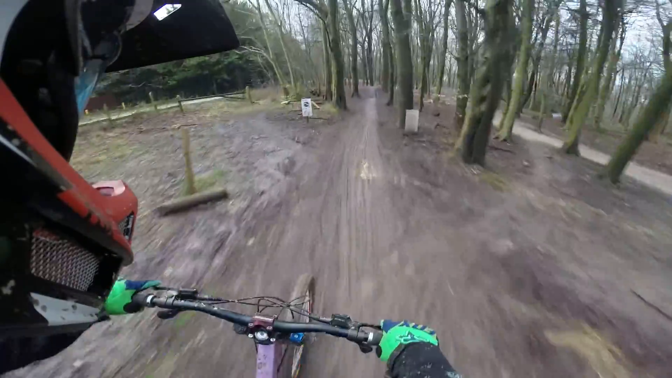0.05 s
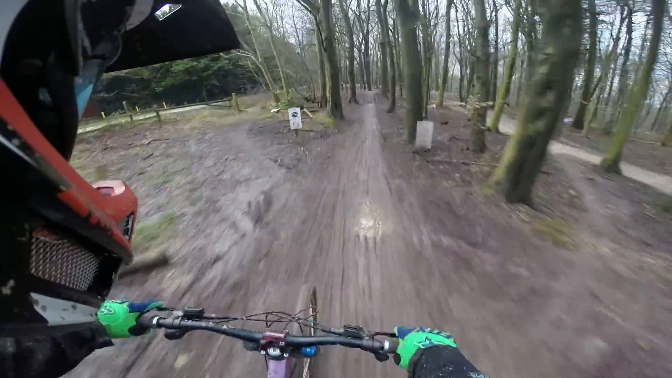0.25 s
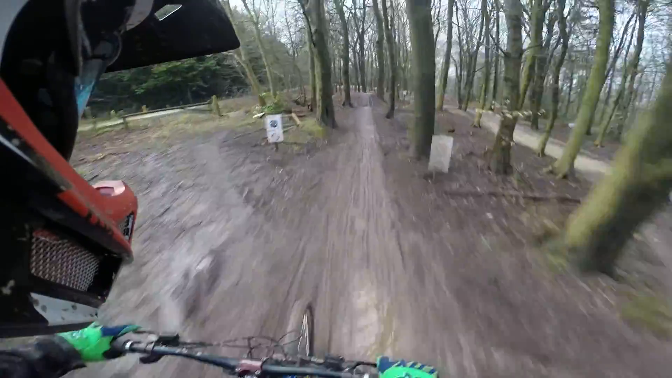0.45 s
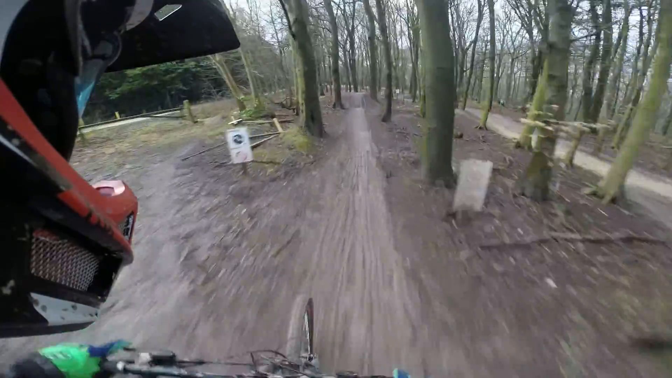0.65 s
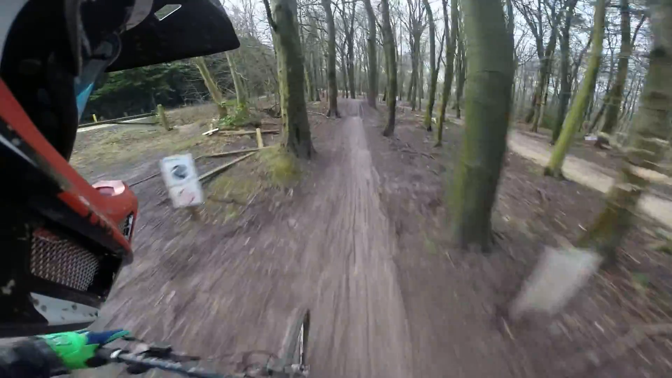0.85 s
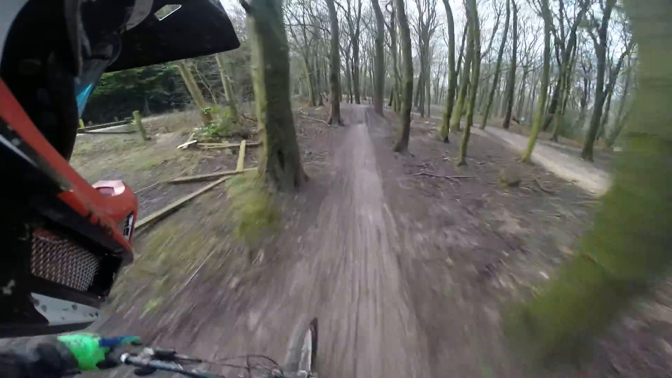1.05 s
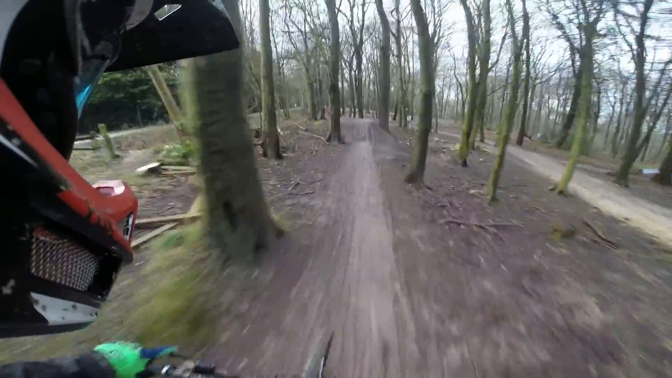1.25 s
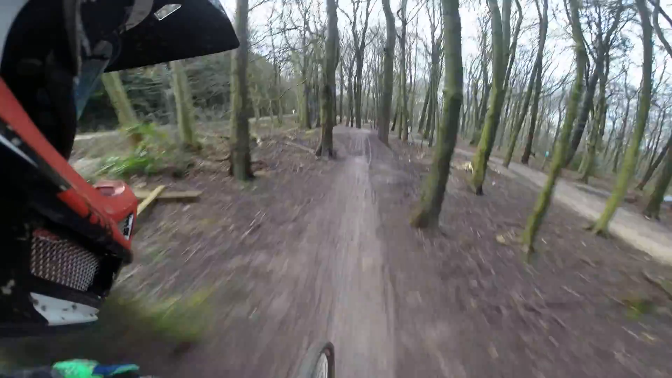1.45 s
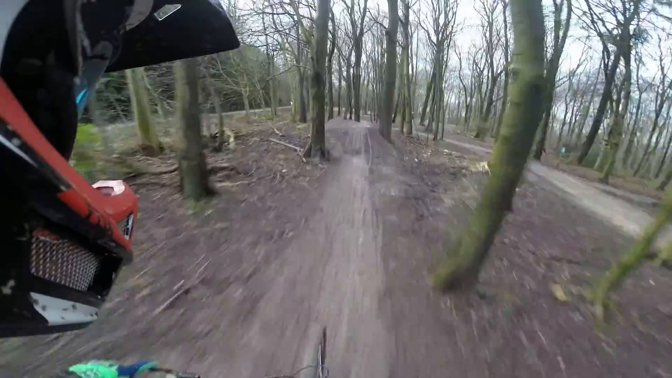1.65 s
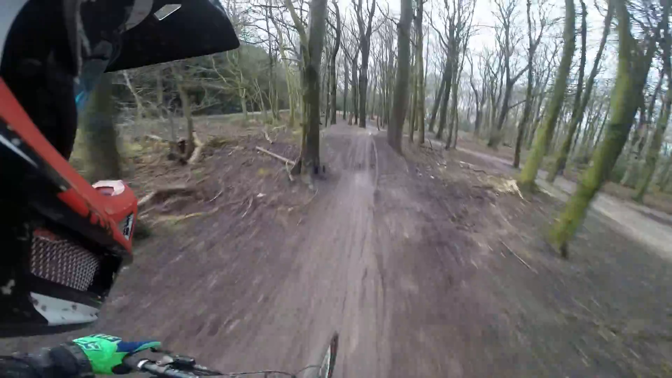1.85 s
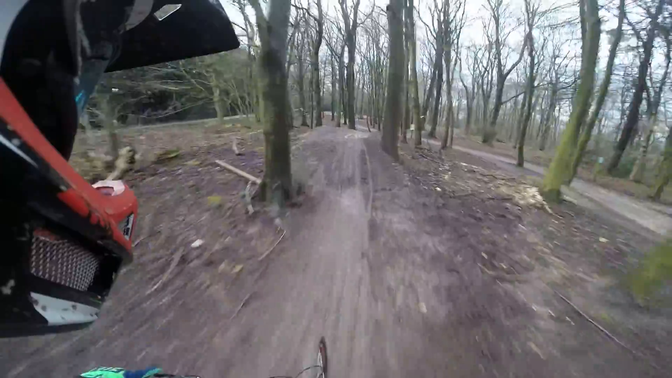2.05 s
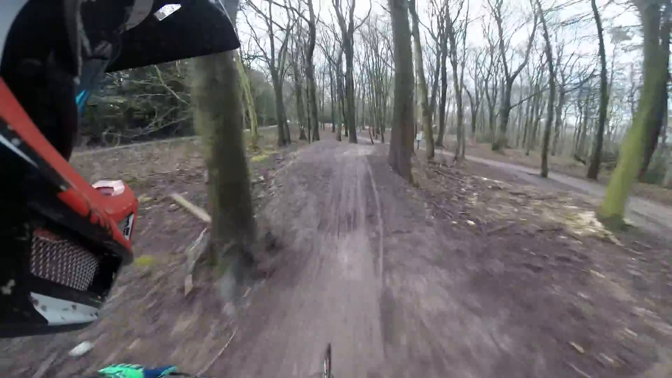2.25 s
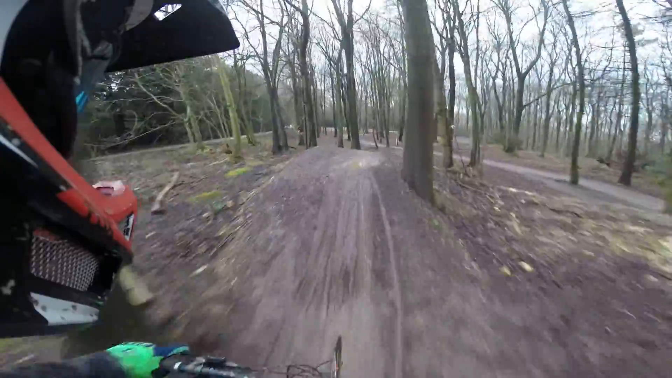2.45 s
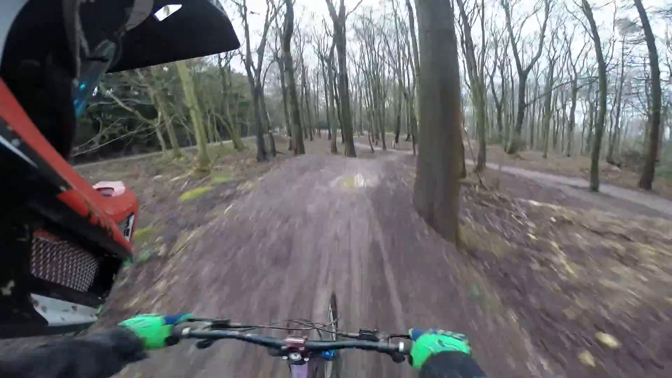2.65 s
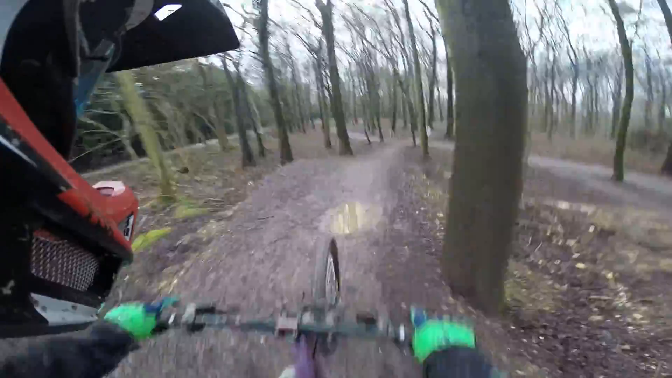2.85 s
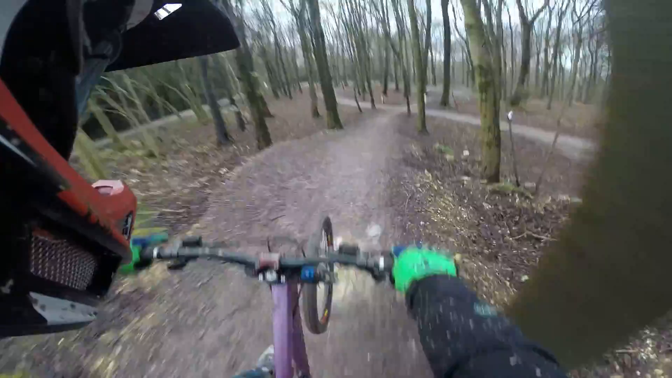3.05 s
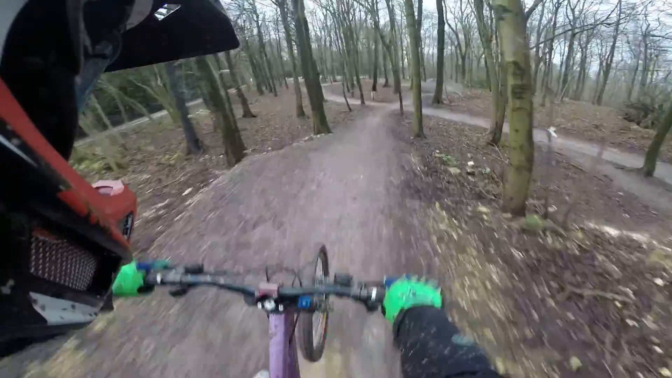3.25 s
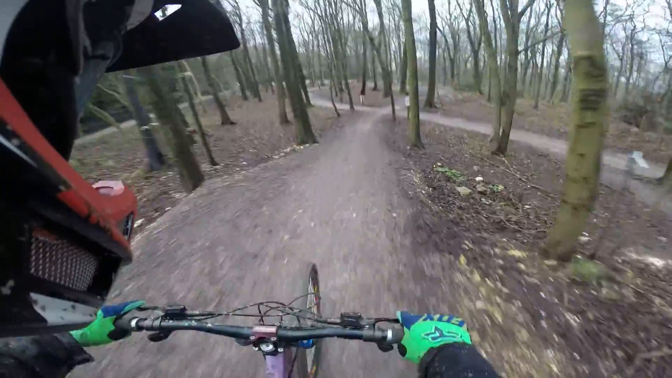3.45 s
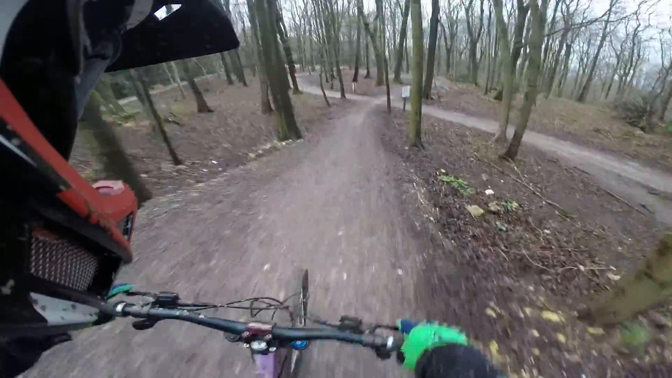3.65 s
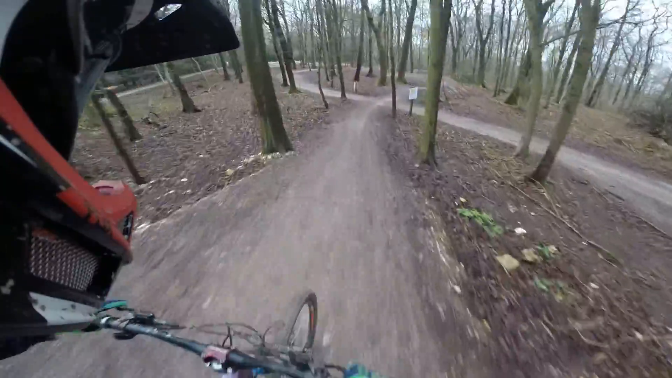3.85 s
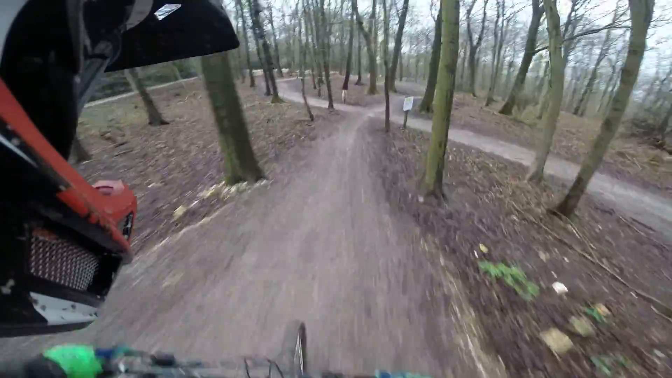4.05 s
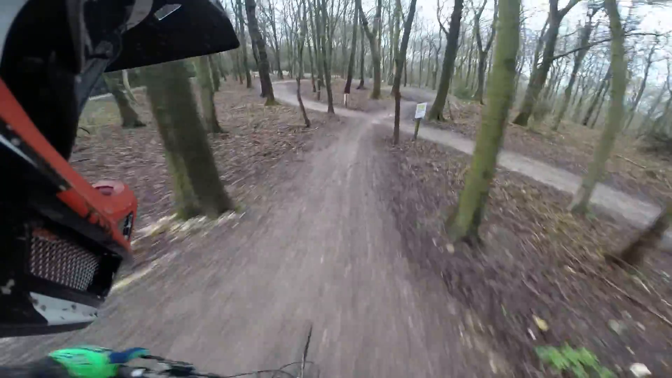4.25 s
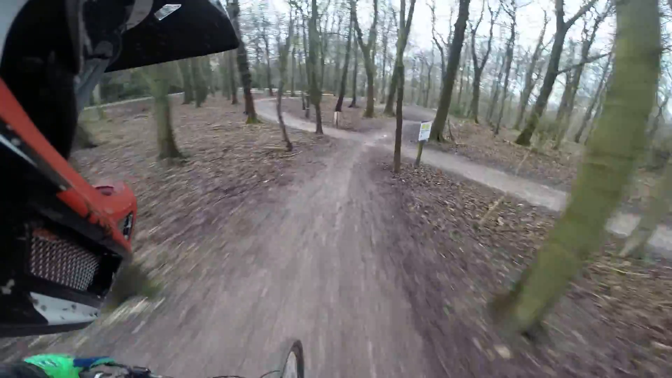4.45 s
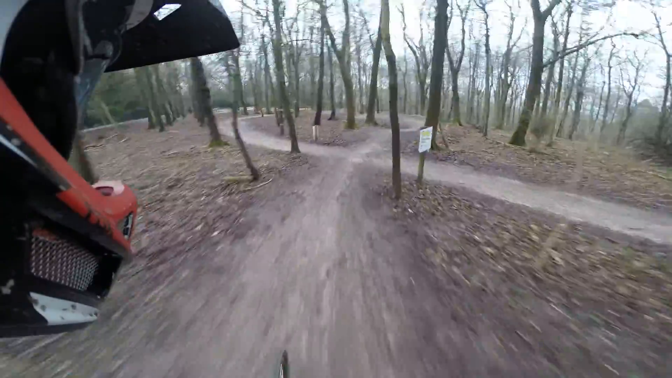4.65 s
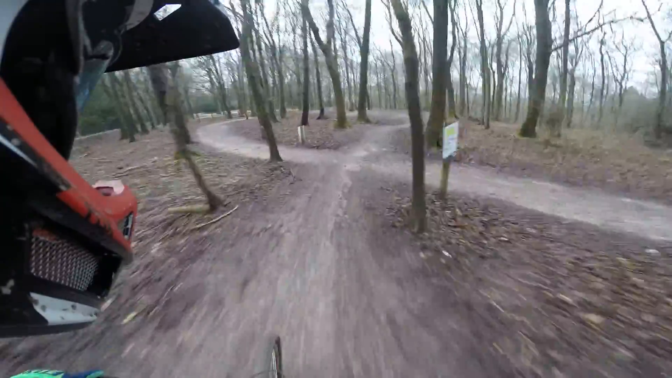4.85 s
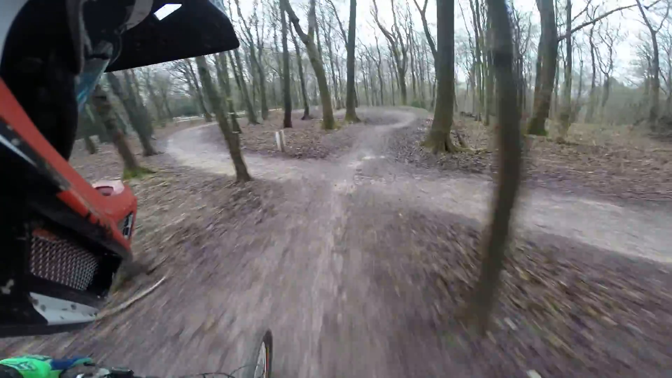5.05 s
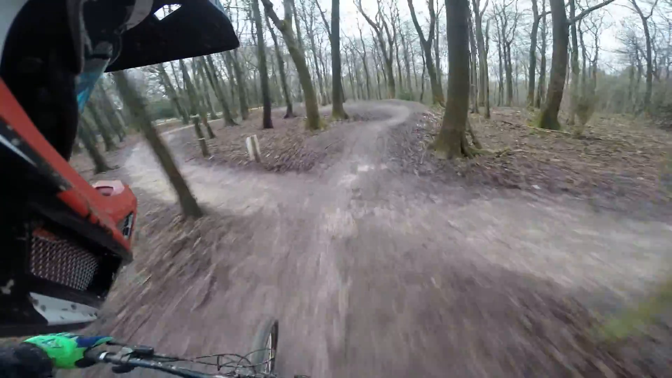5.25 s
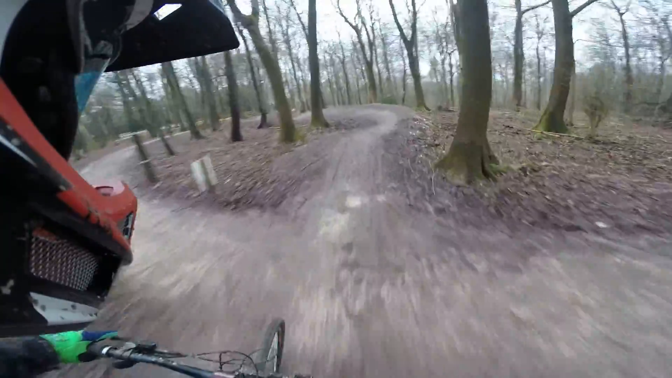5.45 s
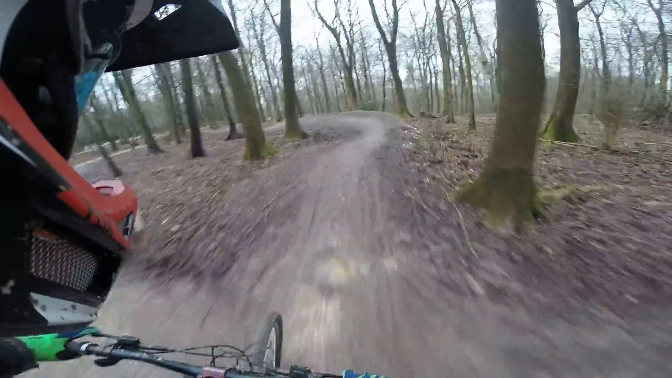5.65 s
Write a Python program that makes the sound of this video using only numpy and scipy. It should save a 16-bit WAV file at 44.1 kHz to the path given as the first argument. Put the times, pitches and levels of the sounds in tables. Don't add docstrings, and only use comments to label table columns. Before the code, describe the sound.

Close, muffled helmet microphone outdoors: steady coarse tyre crunch and fine watery spray, irregular stone clicks and deep wind buffeting. Around the middle come quick mud slaps, a loud thump with low ringing hum, a sudden drop in rolling as the bike lifts, and a rattly landing. Quieter rolling with faint leaf swishes follows, then stones clatter and the drier crunch swells to the end.

```python
import sys
import numpy as np
from scipy import signal
from scipy.fft import rfft, irfft
from scipy.io import wavfile

SR = 44100
rng = np.random.default_rng(int(sys.argv[2]) if len(sys.argv) > 2 else 0)


def transcribe(signal):
    frames = np.atleast_2d(signal).T
    limited = np.clip(frames, -1, 1)
    pcm = np.round(limited * 32767).astype(np.int16)
    wavfile.write(sys.argv[1], SR, pcm)


N = 251370

# time_s, rolling_db, wetness_db (sizzle re rolling), mount_hum_db
TRAIL = [(0.0, -45.5, -7.5, -53), (0.4, -46, -8.5, -53), (0.88, -45, -8, -56), (0.96, -45.5, -12.5, -52.5),
         (1.45, -42, -10.5, -51.5), (2.25, -42.5, -9.5, -55), (2.55, -44.5, -7, -52.5),
         (2.8, -48.5, -6, -52), (2.97, -47.5, -4.5, -55), (3.06, -50, -10, -42), (3.16, -46.5, -17.5, -52),
         (3.23, -56, -12, -56), (3.6, -53.5, -8, -65), (4.12, -51, -15, -55), (4.24, -45, -18, -61),
         (4.5, -42.5, -14, -56), (5.02, -40.5, -15, -58), (5.7, -43, -14.5, -57)]
# centre_s, extra_wetness_db, half_width_s
PUDDLES = [(.06, 4.5, 0.018), (.2, 4, 0.083), (.57, 4, 0.099), (.8, 2, 0.052), (1.04, 4, 0.029),
           (1.36, 4, 0.047), (1.53, 1, 0.034), (1.63, 1.5, 0.033), (1.85, 4, 0.024), (2.0, 1, 0.025),
           (2.16, 1, 0.027), (2.27, 5.5, 0.017), (2.38, 4.5, 0.021), (2.6, 1, .03), (2.74, 6, 0.02),
           (2.81, 3.5, 0.057), (2.89, 2.5, 0.016), (3.47, 10.5, 0.035)]
# pitch_hz, width_hz, level_db
CASE_LOW = [(1600, 158, -3), (1952, 690, -1.5), (2180, 390, 3.5), (2568, 303, 1)]
CASE_EDGE = [(2786, 175, 1.5), (3220, 460, -4.5)]
CASE_MID = [(3830, 330, -4.5), (4750, 710, 3.5), (4845, 246, 6), (6000, 476, 2.5)]
CASE_TOP = [(7160, 410, 5), (8800, 790, 2.5), (9910, 430, 3), (11000, 660, -0.5), (13000, 2500, -8)]
# start_s, dull_db, bright_db
STONES = [(0.128, -47, -36), (0.176, -31, -45), (0.519, -31, -40), (0.5545, -50, -36), (0.574, -35, -35),
          (1.131, -20, -36.5), (1.661, -33, -33), (2.0046, -20, -38), (2.1665, -35, -47),
          (2.3066, -16, -35), (2.6447, -22, -47), (2.6995, -21, -35), (2.7668, -28, -31.5),
          (2.825, -46, -42), (3.1592, -41, -53), (3.2122, -54, -58), (3.366, -36, -53), (3.4216, -23, -46),
          (3.754, -40, -50), (3.9764, -85, -50), (4.19, -37, -47), (4.2675, -33, -43), (4.2825, -27, -45),
          (4.433, -26, -47), (4.4674, -38, -45), (4.5118, -22.5, -41), (4.6828, -24, -43),
          (4.6957, -25, -41), (5.223, -53, -38), (5.384, -53, -53)]
# start_s, level_db,
# pitch_hz, t60_s
PINGS = [(1.6611, -27, 2110, 0.048), (1.663, -32, 6100, .012), (2.3076, -9.5, 2370, 0.0058),
         (2.3067, -21.5, 6000, 0.0045), (2.307, -40, 12650, 0.0066), (2.645, -28.5, 2420, 0.034),
         (2.7665, -36, 6070, 0.0068), (2.8456, -27, 3080, 0.013), (3.2120, -45.5, 450, 0.13),
         (3.212, -38, 6100, 0.0067), (3.4304, -26.5, 2800, 0.013), (3.4430, -39.5, 8150, 0.0064),
         (3.4440, -30.5, 450, 0.036), (3.4460, -38, 623, .06), (3.461, -30.5, 1600, 0.01),
         (3.776, -42, 223.7, 0.18), (4.2664, -27.5, 2980, 0.011)]
SLAP_S = [
    2.672,
    2.698,
    2.845,
    3.421,
]
# low_db, mid_db, top_db, fade_s
SLAPS = [
    (-25, -32, -42, 0.021),
    (-20, -34, -47, 0.044),
    (-19, -31.5, -50.5, 0.05),
    (-23.5, -35, -52, 0.039),
]
# pitch_hz, level_db, t60_s
MOUNT_MODES = [(95.86, -0.5, 0.59), (226.5, -1.5, 0.17), (287, -6.5, 0.035), (470, -15, 0.015),
               (585, -0.5, 0.042), (810, -24, 0.027), (1013, -7.5, 0.037), (1220, -17, 0.017),
               (1570, 4, 0.012), (1880, 6, 0.015), (2130, -12, 0.01)]
# start_s, level_db, hardness_db_per_octave
KNOCKS = [(1.394, -36.5, -5), (1.71, -35.5, -13), (1.986, -39.5, -25), (2.717, -36.5, -2.5),
          (3.046, -43, 4), (3.0478, -10.5, -1.5), (3.212, -69, 4.5), (3.443, -47.5, 1), (3.471, -29.5, -7),
          (4.173, -45, -11), (4.259, -49.5, -2.5), (5.401, -47.5, -14)]
# centre_s, level_db, pitch_hz, swings, lean_half_turns (0 crest, 1 trough)
JOLTS = [
    (2.755, -11, 25.1, 1.96, 0.046),
    (3.046, -8, 35.7, 2, 0.48),
    (3.478, -12.5, 25.6, 1.5, 0.038),
    (3.537, -14.5, 32.7, 2.9, 1),
]
# centre_s, level_db, half_width_s
GUSTS = [(.05, -28.5, 0.05), (.14, -32.5, 0.02), (.28, -32.5, .05), (.55, -27.5, 0.052),
         (.71, -29.5, 0.068), (.93, -33, 0.052), (1.09, -29, 0.048), (1.23, -26, 0.047),
         (1.46, -28.5, 0.081), (1.66, -26.5, 0.053), (1.83, -36, 0.072), (2.08, -29.5, 0.096),
         (2.24, -35.5, 0.065), (2.43, -28.5, 0.051), (2.58, -38.5, 0.037), (2.76, -27.5, 0.087),
         (2.93, -34.5, 0.092), (3.068, -21.5, 0.076), (3.22, -30, 0.021), (3.52, -21.5, 0.065),
         (3.68, -34, 0.12), (3.85, -28, .04), (3.98, -30.5, 0.016), (4.09, -34, 0.048),
         (4.23, -38.5, 0.032), (4.41, -29.5, 0.055), (4.58, -32, 0.076), (4.7, -32.5, 0.045),
         (5.5, -28.5, 0.05), (5.62, -40, 0.07)]
# pitch_hz, density_db
RUSH_SPECTRUM = [(45, 4), (72, 5.5), (130, 6), (250, 2), (400, -2), (600, -2.5), (850, -6.5), (1200, -3.5),
                 (1600, 3.5)]
# start_s, level_db
SWISHES = [(3.5743, -58), (3.6252, -61), (3.7494, -64), (3.8594, -60), (3.9928, -59), (4.1111, -61),
           (4.1495, -56), (4.2682, -59), (4.3194, -58), (4.3595, -69), (4.4294, -62), (4.4977, -57),
           (4.5945, -83), (4.6638, -66), (4.7671, -64), (4.8294, -72), (4.9594, -73), (5.0894, -69),
           (5.1594, -96), (5.223, -75), (5.2994, -77), (5.3847, -54), (5.4306, -56), (5.5134, -56),
           (5.6745, -83)]
# pitch_hz, rms_db
WHINE = [(8781, -76), (11659, -93), (11688, -88), (11718, -83), (14625, -79), (14655, -89)]
# pitch_hz, density_db
HISS_SPECTRUM = [(3820, -59), (6500, -12), (9050, -6), (9590, 7), (13900, 4), (15200, 8), (15500, -45)]

CRUNCH_DB, CRUNCH_PER_WET, SPRAY_DB, SPRAY_PER_WET = 0.32, 0.47, -7.5, 1.405
TAKE_OFF_S, LANDING_S, LIFT_S, AIRBORNE_CRUNCH_DB = 3.2, 3.42, 0.03, -8
STONE_TOP_DB, STONE_TOP_PER_WET = -4, 1.6
SCUFF_DECAY_S, SLAP_RISE_S = 0.00057, 0.0058
LULL_DB, HUM_PER_GUST = -42, 0.1
RUSH_DB, RUSH_PER_ROLL = -53, 0.41
HISS_DB = -81.5


def from_db(db):
    return 10 ** (np.asarray(db) / 20)


def rms_one(x):
    return x / np.sqrt(np.mean(x ** 2) + 1e-20)


def in_time(rows):
    time_s, *columns = np.transpose(rows)
    return [np.interp(np.arange(N) / SR, time_s, column) for column in columns]


def bells(rows):
    centre_s, _, half_width_s = np.transpose(rows)
    t = np.arange(0, N, 20)[:, None] / SR
    return np.exp(-0.5 * ((t - centre_s) / half_width_s) ** 2)


def spread(slow):
    return np.interp(np.arange(N), np.arange(0, N, 20), slow)


def drift(rate_hz):
    r = np.exp(-80 * np.pi * rate_hz / SR)
    noise = rng.standard_normal(N // 40 + 2002)
    slow = signal.lfilter([1], [1, -2 * r, r * r], noise)[2000:]
    return np.interp(np.arange(N) / 40, np.arange(len(slow)), rms_one(slow))


def ring(clicks, hz, t60_s):
    r, w = from_db(-60 / (t60_s * SR)), 2 * np.pi * hz / SR
    return signal.lfilter([0, np.sin(w)], [1, -2 * r * np.cos(w), r * r], clicks + 1e-18)


def resonate(x, modes):
    out = 0
    for k, (hz, width_hz, db) in enumerate(modes):
        r = np.exp(-np.pi * width_hz / SR)
        top = (1 - r * r) / 2 * from_db(db) * (-1) ** k
        w = 2 * np.pi * hz / SR
        out = out + signal.lfilter([top, 0, -top], [1, -2 * r * np.cos(w), r * r], x)
    return out


def steep(x, low_hz, high_hz):
    band = [low_hz, min(high_hz, 0.45 * SR)]
    return signal.sosfilt(signal.butter(2, band, "band", fs=SR, output="sos"), x)


def coloured(spectrum):
    hz = np.maximum(np.fft.rfftfreq(N, 1 / SR), 1)
    point_hz, point_db = np.transpose(spectrum)
    db = np.interp(np.log(hz), np.log(point_hz), point_db, left=-80, right=-80)
    return rms_one(irfft(rfft(rng.standard_normal(N)) * from_db(db), N))


def evened(x, top_hz):
    swing = signal.hilbert(x)
    flat = (swing / np.abs(swing) ** 0.8).real
    return rms_one(signal.sosfiltfilt(signal.butter(3, top_hz, fs=SR, output="sos"), flat))


def case(low, edge, mid, top):
    return (steep(resonate(low, CASE_LOW), 730, 2800),
            -steep(resonate(edge, CASE_EDGE), 2660, 4140),
            steep(resonate(mid, CASE_MID), 3200, 6170),
            steep(resonate(top, CASE_TOP), 5500, 13000))


def grit(per_s, spread_db, clump_db):
    sizes = from_db(spread_db * np.minimum(rng.exponential(1, N), 5)) * rng.choice([-1, 1], N)
    chance = per_s * from_db(clump_db * drift(25)) / SR
    return rms_one(sizes * (rng.random(N) < chance))


def tyres():
    rolling_db, wet_db, _ = in_time(TRAIL)
    wet_db = wet_db + spread(bells(PUDDLES) @ np.array(PUDDLES)[:, 1])
    t = np.arange(N) / SR
    airborne = np.clip((t - TAKE_OFF_S) / LIFT_S, 0, 1) * (t < LANDING_S)
    crunch_db = CRUNCH_DB + CRUNCH_PER_WET * wet_db + AIRBORNE_CRUNCH_DB * airborne + 0.38 * drift(17)
    spray_db = SPRAY_DB + SPRAY_PER_WET * wet_db

    big_grains = grit(1200, spread_db=3.5, clump_db=4.0)
    air_level = from_db(2.3 * drift(22))
    drives = []
    for big, small in ((0.43, 0.87), (0.86, 0.91), (1.0, 1.0), (1.0, 0.48)):
        small_grains = grit(2500, spread_db=3.0, clump_db=4.0)
        air = air_level * rng.standard_normal(N)
        drives.append(big * big_grains + small * small_grains + air)
    low, edge, mid, top = map(rms_one, case(*drives))
    groups = low + from_db(crunch_db) * edge + from_db(wet_db) * mid + from_db(spray_db) * top
    return from_db(rolling_db + 0.43 * drift(17.4)) * groups


def through_case(dull, bright, top):
    return sum(case(dull + 1e-18, dull + 1e-18, bright + 1e-18, top + 1e-18))


def stones():
    t = np.arange(200) / SR
    drives = np.zeros((3, N + len(t)))
    wet_db = in_time(TRAIL)[1]
    for start_s, dull_db, bright_db in STONES:
        i = round(start_s * SR)
        scuff = rng.standard_normal(len(t)) * 0.08 * np.exp(-t / SCUFF_DECAY_S)
        top_db = bright_db + STONE_TOP_DB + STONE_TOP_PER_WET * wet_db[i]
        group_db = np.array([dull_db - 1, bright_db + 4, top_db + 3])
        drives[:, i:i + len(t)] += from_db(group_db)[:, None] * rms_one(scuff + (t == 0))
    dull, bright, top = drives[:, :N]
    return through_case(dull, steep(bright, 3300, 5960), top)


def slaps():
    drives, mud = np.zeros((3, N)), rng.standard_normal(N)
    for start_s, (*group_db, fade_s) in zip(SLAP_S, SLAPS):
        since_s = np.arange(N) / SR - start_s
        swell = np.clip(since_s / SLAP_RISE_S, 0, 1) * np.exp(-np.abs(since_s) / fade_s)
        drives += from_db(group_db)[:, None] * mud * swell
    return through_case(*drives)


def pings():
    out = np.zeros(N)
    for start_s, db, hz, t60_s in PINGS:
        click = np.arange(N) == round(start_s * SR)
        out += from_db(db) * steep(ring(click, hz, t60_s), hz / 2, hz * 2)
    return out


def mount_knocks():
    start_s, level_db, hardness_db = np.transpose(KNOCKS)
    at, out = np.round(start_s * SR).astype(int), np.zeros(N)
    for hz, mode_db, t60_s in MOUNT_MODES:
        scatter_db = 0.4 * rng.standard_normal(len(at))
        clicks = np.zeros(N)
        clicks[at] = -from_db(level_db + mode_db + hardness_db * np.log2(hz / 100) + scatter_db)
        if hz > 800:
            clicks += 0.11 * np.roll(clicks, round(0.00443 * SR))
        out += ring(clicks, hz, t60_s)
    return signal.sosfilt(signal.butter(10, 2200, fs=SR, output="sos"), out)


def mount_hum(gust_db):
    bumps_db = in_time(TRAIL)[2]
    hum_db = bumps_db + HUM_PER_GUST * (gust_db - gust_db.mean()) + 2.4 * drift(5)
    trail = rng.standard_normal(N)
    hum = evened(steep(ring(trail, 97.7, 0.44), 52.0, 147), top_hz=125)
    hum += from_db(-9.5) * rms_one(ring(trail, 229.3, 0.48))
    hum += from_db(-17.0) * rms_one(ring(trail, 600.4, 0.49))
    return from_db(hum_db - 0.5) * hum


def gusts():
    gust_power = from_db(2 * np.array(GUSTS)[:, 1])
    power = from_db(2 * LULL_DB) + bells(GUSTS) ** 2 @ gust_power
    return spread(10 * np.log10(power))


def heave(gust_db):
    swings = coloured([(10, -8), (18, -0.5), (29, -2), (41, 0.5), (52, -23)])
    even = evened(swings, top_hz=51)
    t, jolts, calm = np.arange(N) / SR, np.zeros(N), np.ones(N)
    for centre_s, db, hz, swing_count, lean in JOLTS:
        bell = np.exp(-0.5 * ((t - centre_s) * hz * 3.77 / swing_count) ** 2)
        jolts += from_db(db) * bell * np.cos(2 * np.pi * hz * (t - centre_s) + np.pi * lean)
        calm *= 1 - 0.9 * np.sqrt(bell)
    return jolts + from_db(np.minimum(gust_db, -20)) * calm * even


def rush():
    rolling_db = in_time(TRAIL)[0]
    rush_db = RUSH_DB + RUSH_PER_ROLL * (rolling_db - rolling_db.mean()) + 1.0 * drift(13)
    return from_db(rush_db) * coloured(RUSH_SPECTRUM)


def swishes():
    t, swell = np.arange(N) / SR, np.zeros(N)
    for start_s, db in SWISHES:
        swell += from_db(db - 8) * np.exp(-0.5 * ((t - start_s - 0.012) / 0.014) ** 2)
    return swell * rms_one(steep(rng.standard_normal(N), 4000, 11000))


def electronics():
    t, tones = np.arange(N) / SR, np.zeros(N)
    for hz, rms_db in WHINE:
        tones += np.sqrt(2) * from_db(rms_db) * np.sin(2 * np.pi * hz * t + 0.25 * drift(3))
    return tones + from_db(HISS_DB) * coloured(HISS_SPECTRUM)


def scene():
    gust_db = gusts()
    bike = tyres() + stones() + slaps() + pings()
    helmet = mount_knocks() + mount_hum(gust_db)
    wind = heave(gust_db) + rush()
    return (bike + helmet + wind + swishes() + electronics())[None]


def roll_off(x):
    return signal.sosfilt(signal.butter(12, 16130, fs=SR, output="sos"), x)


def record(dry):
    rounded = 1.5 * np.tanh(dry / 1.5)
    mix = signal.sosfilt(signal.cheby2(14, 60, 15600, fs=SR, output="sos"), rounded)
    return roll_off(mix)


dry = scene()
out = record(dry)
transcribe(out)
```